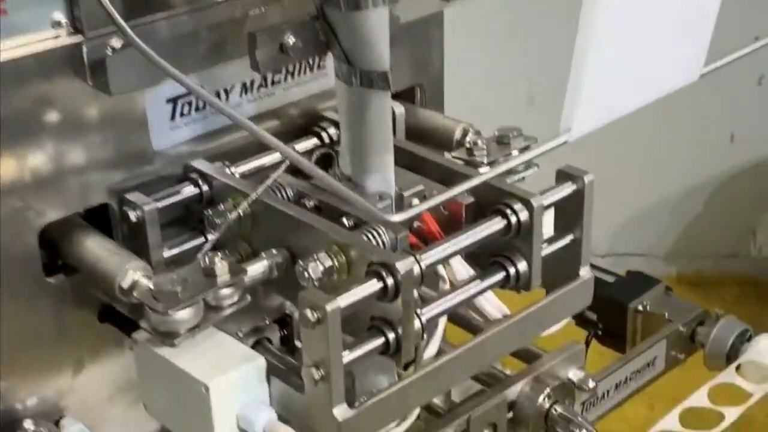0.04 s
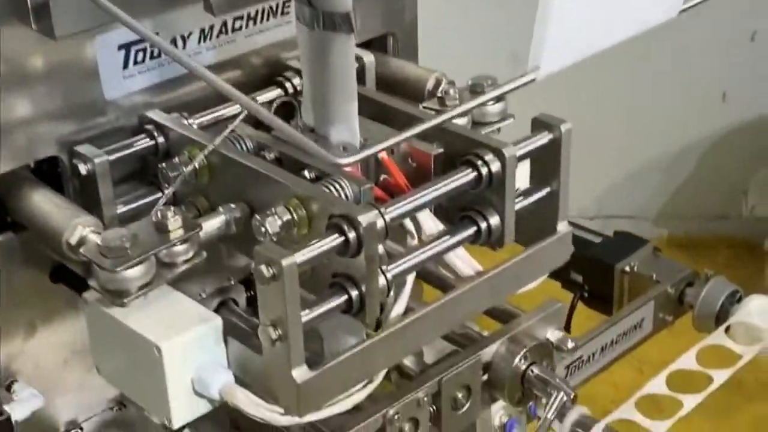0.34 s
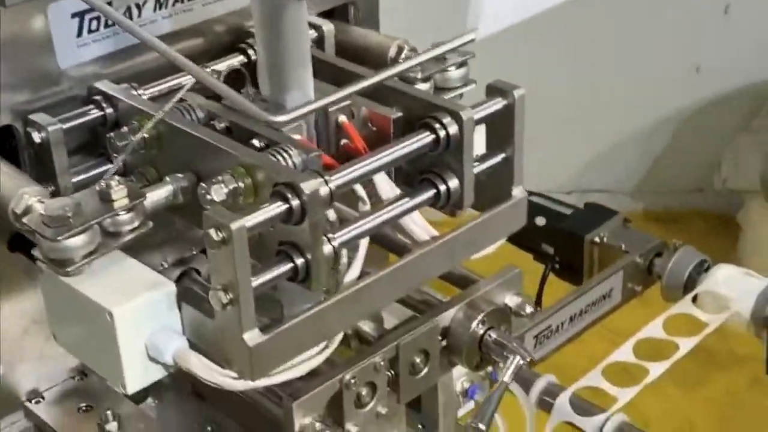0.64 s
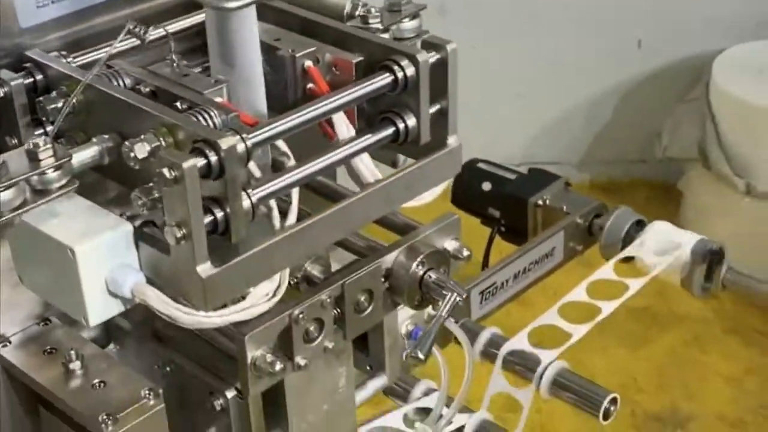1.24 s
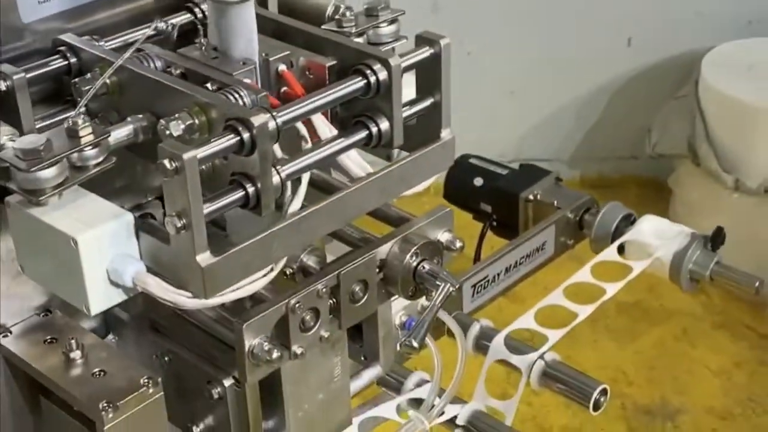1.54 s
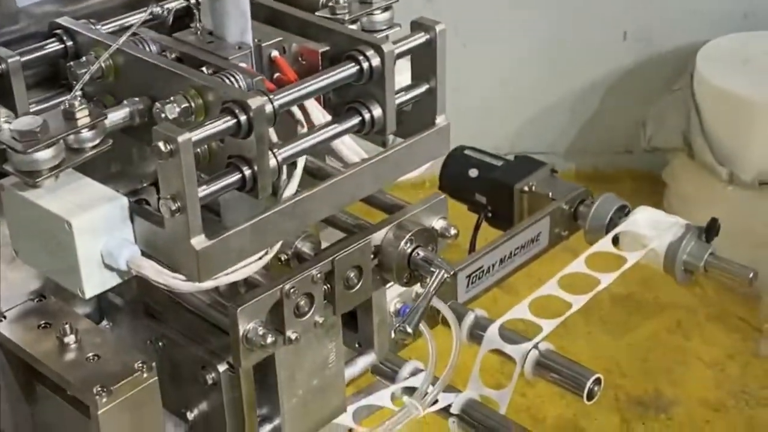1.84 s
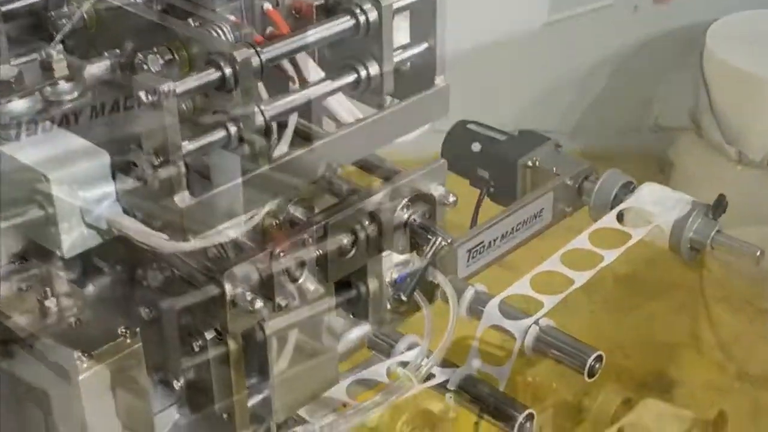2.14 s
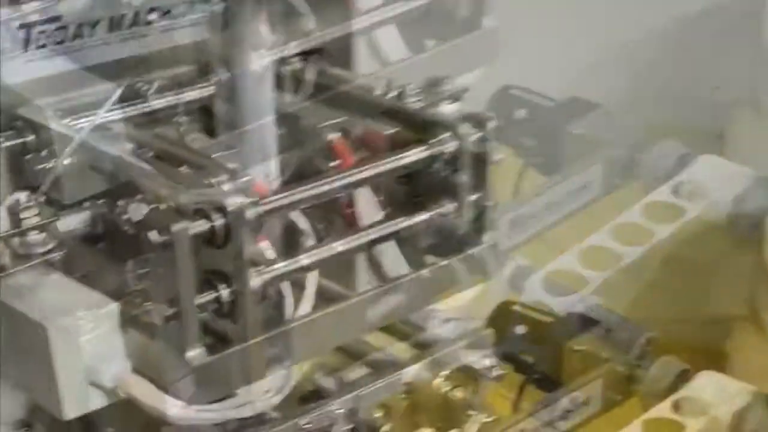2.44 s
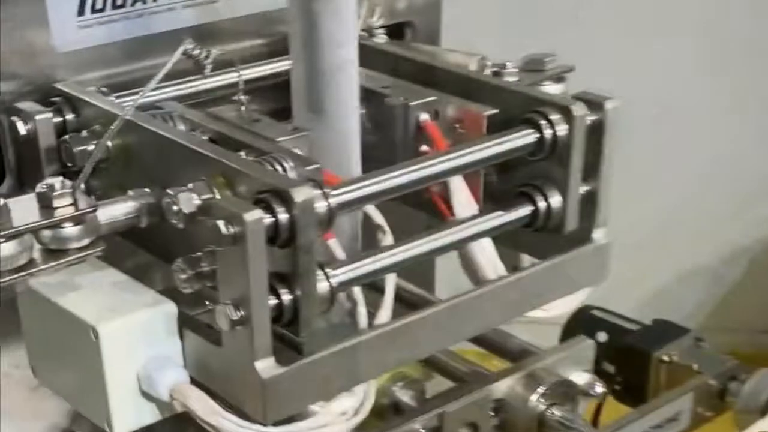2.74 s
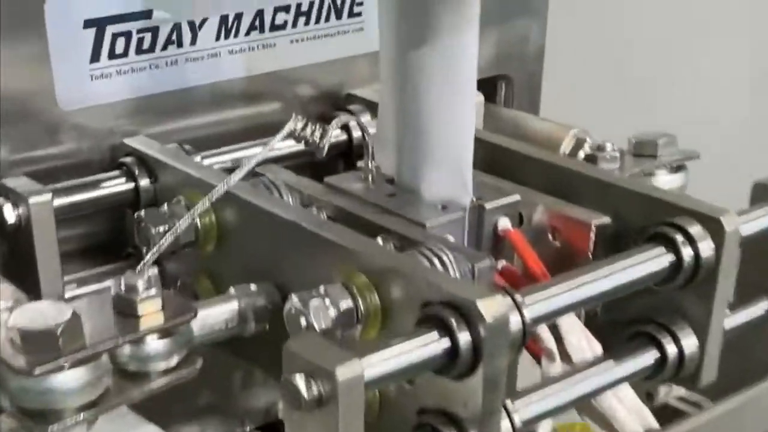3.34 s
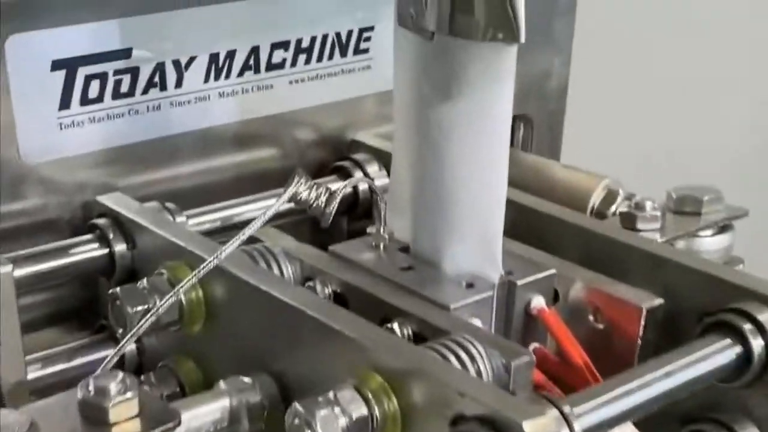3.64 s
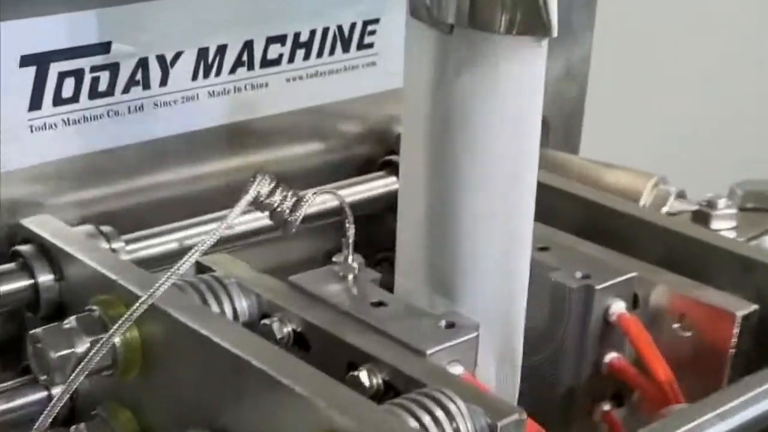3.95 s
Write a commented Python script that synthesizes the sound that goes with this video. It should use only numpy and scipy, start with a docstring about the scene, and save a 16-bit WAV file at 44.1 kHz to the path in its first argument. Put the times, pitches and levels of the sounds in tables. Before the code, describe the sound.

An air-driven packing machine runs close by in a hard-walled workshop. About every second and a half, valves puff, steel jaws clack shut and air hisses out, with rattling knocks and a brief whine over a steady motor hum.

```python
"""In a hard-walled workshop, a packing machine driven by air runs close by, about a bag every 1.56 s.
Motors hum under it all. The film feed whines, and the sliding carriage whistles and knocks.
The steel sealing jaws clack shut, cylinders let air out through a silencer, and valves puff.
Air is shaped noise; struck metal is a set of fading tones. Walls and steel plates add echoes,
and a small stereo recorder makes the treble sound wider."""
import sys
import numpy as np
from scipy import signal
from scipy.fft import rfft, irfft
from scipy.io import wavfile
from scipy.ndimage import map_coordinates

SR = 44100
rng = np.random.default_rng(int(sys.argv[2]) if len(sys.argv) > 2 else 0)


def wav_out(sig):
    """Save sig, one row per channel (or a flat mono array), as 16-bit PCM at SR to the path in sys.argv[1]."""
    wavfile.write(sys.argv[1], SR, np.round(np.clip(np.atleast_2d(sig).T, -1, 1) * 32767).astype(np.int16))


N = 176400
T = np.arange(N) / SR
FREQS = np.maximum(np.arange(N // 2 + 1) * SR / N, 1)

# Tones of motors and mains, drives, film feed and whistle (pitch [Hz], level [dB])
HUM_TONES = [(61, -53), (70.6, -40), (88.3, -58), (100, -30), (106.5, -45), (119, -43), (200, -56),
             (212, -46.5), (283, -56.5)]
DRIVE_TONES = [(640, -48), (2300, -59), (4100, -71), (4960, -58)]
FEED_TONES = [(1593, -47.5), (2310, -38.5), (2772, -50), (3140, -43), (3580, -49), (4129, -42.5),
              (5290, -51), (6406, -50.5), (7650, -55), (9000, -57), (10471, -65)]
WHISTLE_TONES = [(4720, -54), (6550, -57), (9679, -50), (10304, -51)]
# Noise colours of the workshop and the moving parts (frequency [Hz], level [dB per Hz])
SHOP_RUMBLE = [(20, -79), (40, -68), (58, -56.5), (85, -58.5), (112, -54.5), (140, -61), (250, -60),
               (400, -64), (700, -67), (1200, -69.5), (2000, -76), (3500, -80), (6000, -86.5), (9000, -89),
               (12400, -98)]
FILM_RUSTLE = [(500, -67.5), (1200, -67.5), (2800, -73.5), (4200, -92), (7000, -88), (12000, -97)]
FRAME_RATTLE = [(100, -71), (350, -59), (900, -54.5), (1400, -62), (2500, -69.5), (4200, -68.5),
                (7000, -77.5), (12000, -84)]
SLIDE_RATTLE = [(70, -71), (150, -52.5), (310, -59), (460, -52), (620, -58.5), (1100, -59.5), (1800, -61.5),
                (4000, -69.5), (10000, -86.5)]
JAW_CRACK = [(60, -87), (130, -55), (400, -56.5), (800, -58), (1500, -54), (3500, -53.5), (7000, -60.5),
             (12000, -73)]
JAW_SHUDDER = [(70, -65), (125, -44), (170, -48.5), (260, -57), (480, -54.5), (750, -56.5), (1500, -72)]
# Noise colours of the moving air (frequency [Hz], level [dB per Hz])
WHISTLE_AIR = [(1500, -81), (3500, -75.5), (7000, -85), (12000, -86)]
LEAK_AIR = [(800, -86), (1750, -67.5), (2300, -64.5), (3100, -62.5), (3800, -70), (4750, -59.5),
            (6000, -69.5), (7600, -71.5), (10000, -70.5), (12400, -76)]
EXHAUST_AIR = [(500, -64), (1800, -61), (3500, -60.5), (5500, -62), (8000, -63.5), (10000, -66.5),
               (12400, -72)]
VENT_AIR = [(60, -62), (150, -63), (400, -72.5), (1000, -66), (1700, -65), (2450, -67.5), (3500, -65),
            (4400, -68.5), (5700, -64.5), (7000, -62.5), (7700, -62.5), (8600, -59.5), (9600, -63.5),
            (10800, -59.5), (12400, -64)]
PUFF_AIR = [(200, -62), (500, -58), (1200, -64), (1900, -64.5), (3200, -61), (4300, -63), (5600, -57),
            (7300, -61), (9000, -58), (10800, -54.5), (12400, -59)]
PUFF_SPIT = [(200, -57.5), (550, -57.5), (1400, -61), (2600, -67.5), (4500, -76), (7000, -69.5),
             (12000, -70)]
PUFF_THUMP = [(20, -64), (46, -55), (64, -34.5), (85, -43), (130, -59.5), (260, -53), (500, -80)]
# Pitches that the rods, hollow silencer and shrill nozzle boost (pitch [Hz], width [Hz], boost [dB])
ROD_PEAKS = [(463, 85, 4.5), (1090, 120, 4)]
SILENCER_PEAKS = [(2004, 210, 11), (2830, 190, 10)]
NOZZLE_PEAKS = [(4670, 300, 4), (5550, 250, 12), (5890, 210, 7), (6640, 160, 4.5), (6880, 240, 7.5),
                (12200, 400, 7.5)]

# Carriage knocks (time [s], relative ring level [dB], pitch [ratio], rattle level [dB])
KNOCKS = [(.069, -9, 1.43, -13), (.091, -11, 1.1, -10), (.797, -5.5, 1.11, -6), (.822, -10, 1.06, -16),
          (.992, -3.5, 1.04, -3.5), (1.022, -10, 1.24, -13), (1.207, -6, 0.81, -4.5),
          (1.668, -6.5, 0.81, -6.5), (2.227, -3, 0.55, -2), (2.3, -8, 1.14, -9), (2.366, -4, 1.18, -7),
          (2.425, -10, 1.1, -11), (2.558, -3, 1.04, 0.5), (2.79, -9, .7, -7.5), (3.107, -4, 1.4, -14),
          (3.22, -7, 1.47, -10), (3.927, 2.5, 0.98, -1)]
# Bounces within one knock (delay [s], relative level [dB])
BOUNCES = [(0, 2), (.007, 1), (.019, -8), (.031, -6.5)]
# Ringing tones of the frame (base pitch [Hz], relative level [dB], time to fade by 60 dB [s])
FRAME_TONES = [(411.7, -2.5, 0.21), (668, -1.5, 0.14), (832, 0.5, 0.13), (968, 0, 0.19), (1106, -5, 0.12),
               (1690, -10, 0.13)]
# Jaws closing (time [s], shudder level [dB], crack level [dB], ring pitch [Hz], ring level [dB])
CLACKS = [(0.019, -8, -6, 1298, -21.5), (1.591, -1, -2, 1285, -18), (3.15, -1, -2.5, 1357, -15)]
# Ringing tones of the jaws (pitch [ratio], relative level [dB], time to fade by 60 dB [s])
JAW_TONES = [(.643, -14, 0.15), (.93, -7.5, 0.19), (0.999, -1.5, 0.21), (1.3, -10, 0.099), (2.08, -21, .16),
             (2.3, -8, 0.13), (2.55, -22, 0.072), (2.85, -3, 0.051)]
# Long blasts of air while the jaws press
# (start [s], length [s], level [dB], swell [dB per s], silencer boost [ratio], nozzle boost [ratio])
VENTS = [(0.017, 0.25, -5.5, 10.5, 0.52, 0.47), (1.587, 0.245, -1, 4.5, 0.89, .3),
         (3.163, 0.23, -0.4, -3, 1.04, 0.95)]
# Valve puffs (start [s], length [s], level [dB], spit level [dB], thump level [dB])
PUFFS = [(-.06, 0.067, -1.5, -8, -10), (1.194, 0.13, 0, -3, -2.5), (1.497, 0.094, -1, -7, -2),
         (2.757, 0.15, 0, -5.5, -2.5), (3.057, 0.094, -1, -2, -1.5)]

# Echoes off nearby steel plates (delay [s], level [dB])
PLATE_ECHOES = [(.0013, -9), (.0031, -9.5), (.0052, -5.5), (.0083, -8.5)]
# Stereo width of the noise (frequency [Hz], side level against the middle [dB])
STEREO_WIDTH = [(100, -73), (250, -23.5), (600, -4.5), (1400, -6), (2500, -3.5), (4500, -7.5), (7000, -5),
                (9000, -9), (12000, -7)]
# How far the left wave runs ahead of the right (frequency [Hz], phase [radians])
LEFT_LEAD = [(100, -.09), (700, -.15), (1550, 0), (2050, .8), (2500, 2.6), (3500, 1.3), (4500, 3.05),
             (5200, 3.4), (6200, 6.2), (7250, 6.5), (8300, 9.2), (9400, 9.6), (10450, 12.4), (11500, 12.7),
             (12200, 14.4)]


def gain(db):
    """Turn decibels into a number to multiply by."""
    return 10 ** (np.asarray(db) / 20)


def curve(points):
    """Join a table's points to get a value at every frequency."""
    hz, value = np.array(points, float).T
    return np.interp(np.log(FREQS), np.log(hz), value)


def noise(colour, peaks=()):
    """Shaped stereo noise: left and right are alike in the bass and less so higher up."""
    width = gain(curve(STEREO_WIDTH))
    mid, side = rfft(rng.standard_normal((2, N)))
    db = curve(colour) + sum(boost / (1 + (2 * (FREQS - hz) / band) ** 2) for hz, band, boost in peaks)
    pair = np.array([mid + width * side, mid - width * side])
    return irfft(pair * gain(db) * np.sqrt(SR / 2 / (1 + width ** 2)), N)


def wobble(rate_hz):
    """A smooth random wiggle, typically about 1 in size."""
    wiggle = irfft(rfft(rng.standard_normal(N)) * np.exp(-(FREQS / rate_hz) ** 2), N)
    return (wiggle - wiggle.mean()) / wiggle.std()


def burst(start, length, db, rise_s, sag_db_per_s, fall_s):
    """Loudness of one burst: it rises, sags (a negative sag swells), then dies away."""
    age = np.maximum(T - start, 0)
    ending = np.exp(-np.maximum(age - length, 0) / fall_s)
    return np.minimum(age / rise_s, 1) * gain(db - sag_db_per_s * age) * ending


def tones(table, waver_hz, rate_hz):
    """Pure tones whose pitch wavers at random."""
    out = 0
    for hz, db in table:
        cycles = hz * T + rng.random() + waver_hz * np.cumsum(wobble(rate_hz)) / SR
        out = out + gain(db) * np.sqrt(2) * np.sin(2 * np.pi * cycles)
    return out


def ring(start, table, pitch, scatter, length_s=.4, contact_s=.0038):
    """Struck metal rings with fading tones; each blow varies their level and pitch a little."""
    span = (T >= start) & (T < start + length_s)
    age, out = T[span] - start, np.zeros(N)
    for hz, db, fade_s in table:
        strength = rng.choice([-1, 1]) * gain(db + rng.standard_normal())
        struck_hz = hz * pitch * (1 + scatter * rng.standard_normal())
        out[span] += strength * np.exp(-np.log(1000) * age / fade_s) * np.sin(2 * np.pi * struck_hz * age)
    out[span] *= np.minimum(age / contact_s, 1)
    return out


def background():
    """Motors hum and throb, drives whine thinly and the workshop rumbles."""
    hum = tones(HUM_TONES, waver_hz=.12, rate_hz=8.1)
    whine = tones(DRIVE_TONES, waver_hz=23, rate_hz=72.5)
    return hum + whine + noise(SHOP_RUMBLE) * gain(1.35 * wobble(15))


def film_feed():
    """The feed motor sings roughly as it pulls the rustling film."""
    song = sum(tones([row], waver_hz=35.7, rate_hz=118) * gain(4.2 * wobble(60) + .5)
               for row in FEED_TONES)
    pull = burst(start=.882, length=.11, db=-1, rise_s=.047, sag_db_per_s=3.5, fall_s=.17)
    return (song + noise(FILM_RUSTLE)) * pull


def whistle():
    """A faint, airy whistle swells as the carriage nears its stop."""
    swell = burst(start=3.85, length=.1, db=0, rise_s=.073, sag_db_per_s=5, fall_s=.031)
    return (tones(WHISTLE_TONES, waver_hz=25, rate_hz=53) + noise(WHISTLE_AIR)) * swell


def carriage():
    """The loose carriage knocks and bounces, ringing the frame and rattling small parts."""
    rings = sum(gain(db + bounce_db - 29) * ring(start + delay, FRAME_TONES, pitch, scatter=.013)
                for start, db, pitch, _ in KNOCKS for delay, bounce_db in BOUNCES)
    rattle = sum(burst(start, .014, db, rise_s=.0016, sag_db_per_s=64, fall_s=.025)
                 for start, _, _, db in KNOCKS)
    return rings + noise(FRAME_RATTLE) * rattle


def jaws():
    """The steel jaws meet with a crack and a short ring, and the machine shudders on."""
    rings = crack = shudder = 0
    for start, shudder_db, crack_db, hz, ring_db in CLACKS:
        rings += gain(ring_db) * ring(start, JAW_TONES, hz, scatter=.0024)
        crack += burst(start, .006, crack_db, rise_s=.004, sag_db_per_s=20, fall_s=.019)
        shudder += burst(start, .09, shudder_db, rise_s=.015, sag_db_per_s=15, fall_s=.033)
    return rings + noise(JAW_CRACK) * crack + noise(JAW_SHUDDER) * shudder * gain(2.2 * wobble(86))


def return_stroke():
    """Air leaks, then rushes out and dies away while the carriage rattles along its rods."""
    leak = noise(LEAK_AIR) * burst(2.149, .063, 0, rise_s=.026, sag_db_per_s=16, fall_s=.027)
    rush = noise(EXHAUST_AIR) * burst(2.22, .16, 0, rise_s=.0049, sag_db_per_s=73, fall_s=.2)
    travel = burst(2.225, .19, 0, rise_s=.026, sag_db_per_s=19.5, fall_s=.17)
    slide = noise(SLIDE_RATTLE, ROD_PEAKS) * travel
    return leak + rush * gain(2 * wobble(140)) + slide * gain(1.8 * wobble(70))


def vents():
    """Long blasts of air sputter out; each rings the silencer and the nozzle by its own amount."""
    air = 0
    for start, length, db, swell, hollow, shrill in VENTS:
        peaks = [(hz, width, boost * hollow) for hz, width, boost in SILENCER_PEAKS]
        peaks += [(hz, width, boost * shrill) for hz, width, boost in NOZZLE_PEAKS]
        flow = burst(start, length, db, rise_s=.049, sag_db_per_s=-swell, fall_s=.019)
        air += noise(VENT_AIR, peaks) * flow
    sputter = gain(1.37 * wobble(150) + .8 * wobble(18))
    return air * sputter


def valves():
    """Each valve opens with a spit and a bright puff, and the cylinder starts with a low thump."""
    flow = spit = thump = 0
    for start, length, db, spit_db, thump_db in PUFFS:
        flow += burst(start, length, db, rise_s=.044, sag_db_per_s=70, fall_s=.042)
        spit += burst(start + .006, .015, spit_db, rise_s=.0045, sag_db_per_s=51, fall_s=.031)
        thump += burst(start + .0056, .058, thump_db, rise_s=.022, sag_db_per_s=-1, fall_s=.032)
    puffs = noise(PUFF_AIR) * flow * gain(1.67 * wobble(98))
    return puffs + noise(PUFF_SPIT) * spit + noise(PUFF_THUMP) * thump


def room(sound, fade_s=.62, echo_db=-15.5, delay_s=.012):
    """Hard walls add a blur of echoes that falls by 60 dB in fade_s."""
    tail = rng.standard_normal(N) * np.exp(-np.log(1000) * T / fade_s) * (T > delay_s)
    tail = tail * gain(echo_db) / np.sqrt(np.sum(tail ** 2))
    return sound + signal.fftconvolve(sound, tail[None], axes=1)[:, :N]


def plates(sound, treble_hz=1560, drift_s=.000154):
    """Quick echoes off steel plates make the treble hollow and metallic; low sounds bend round them."""
    treble = irfft(rfft(sound) * FREQS ** 2 / (FREQS ** 2 + treble_hz ** 2), N)
    echoed = treble
    for delay, db in PLATE_ECHOES:
        # The hand-held microphone moves, so each echo's delay wanders.
        position = (T - delay - drift_s * wobble(.733)) * SR
        echo = np.array([map_coordinates(side, [position], order=3, mode="mirror") for side in treble])
        echoed = echoed + gain(db) * echo
    return sound - treble + echoed / np.sqrt(1 + sum(gain(db) ** 2 for _, db in PLATE_ECHOES))


def scene():
    """The working parts echo in the room, over the steady hum."""
    machine = valves() + vents() + return_stroke() + jaws() + carriage() + whistle() + film_feed()
    edge_fade = np.minimum(np.minimum(T, T[-1] - T) / .006, 1)
    return plates((room(machine) + background()) * edge_fade)


def record(dry, top_hz=12450):
    """Shift the left and right waves apart to widen the treble, then cut the highest sounds."""
    lead = np.interp(FREQS, *np.array(LEFT_LEAD).T)
    wide = irfft(rfft(dry) * np.exp(1j * np.array([lead, -lead]) / 2), N)
    return signal.sosfilt(signal.ellip(12, .2, 80, top_hz, fs=SR, output="sos"), wide)


dry = scene()
out = record(dry)
wav_out(out)
```